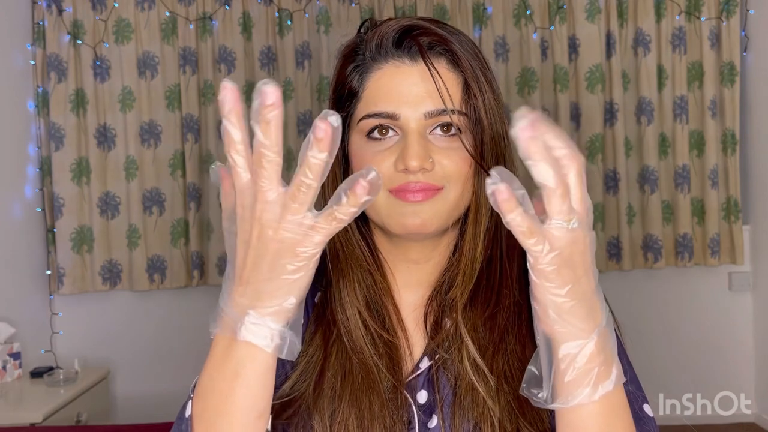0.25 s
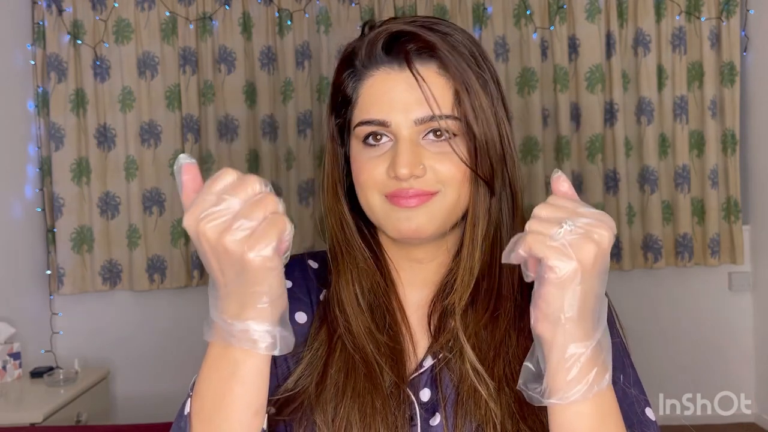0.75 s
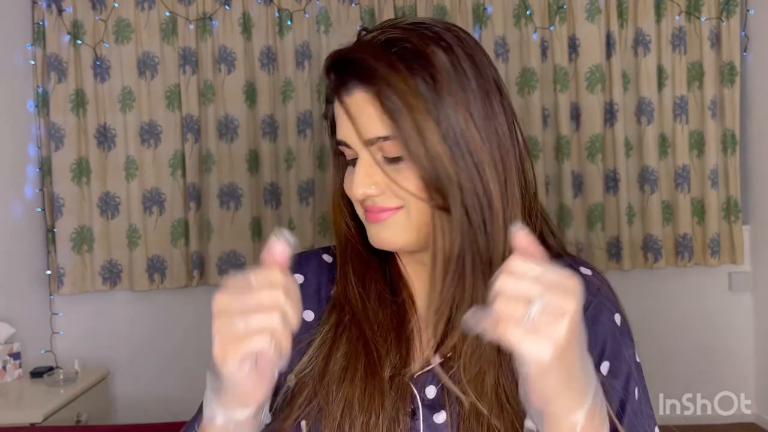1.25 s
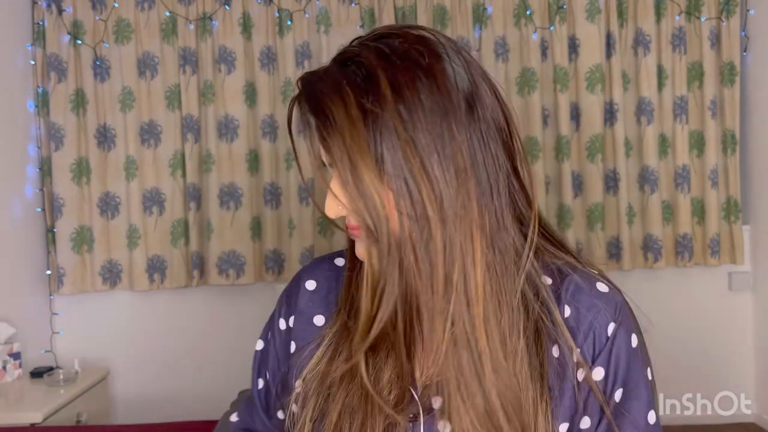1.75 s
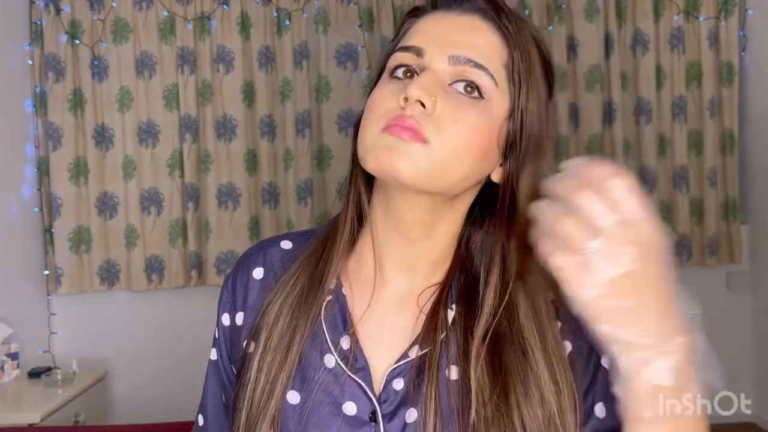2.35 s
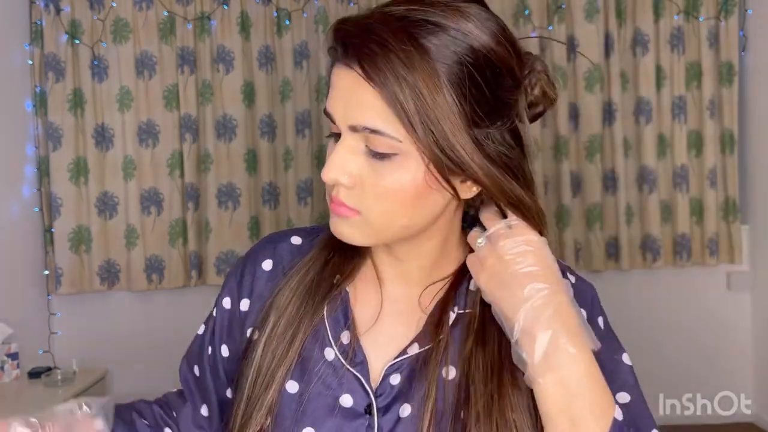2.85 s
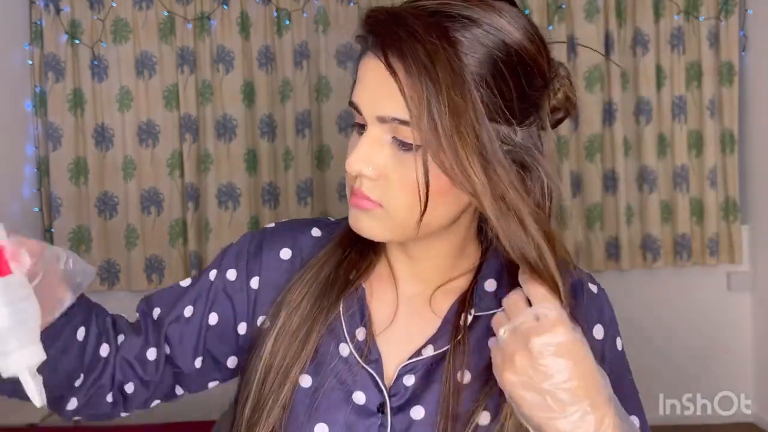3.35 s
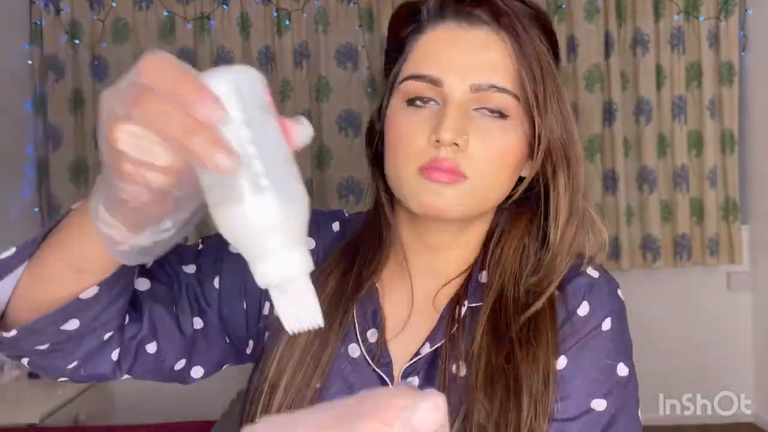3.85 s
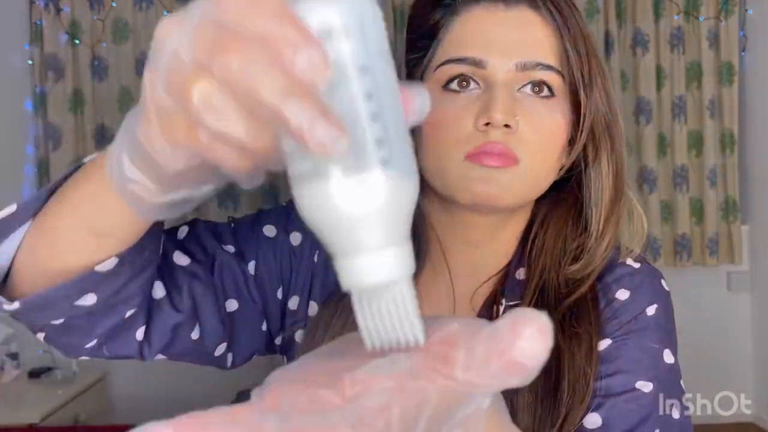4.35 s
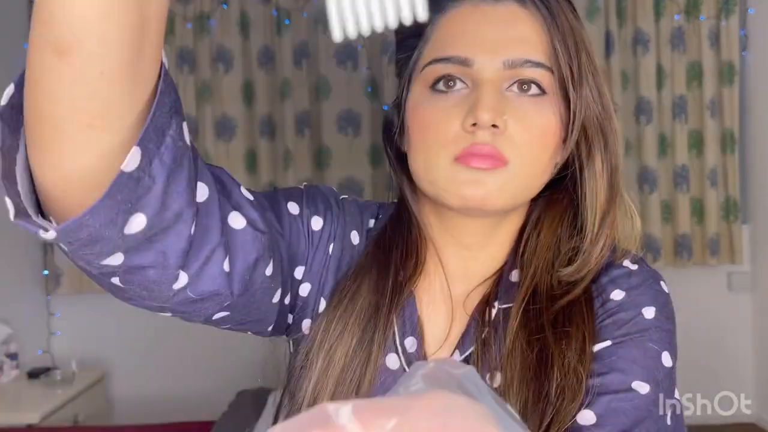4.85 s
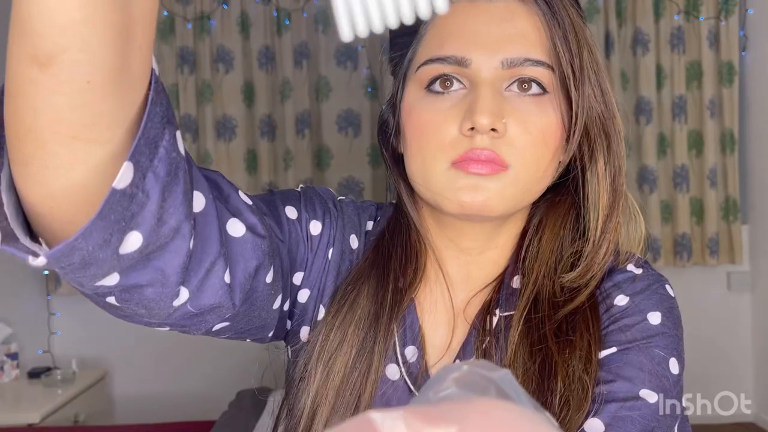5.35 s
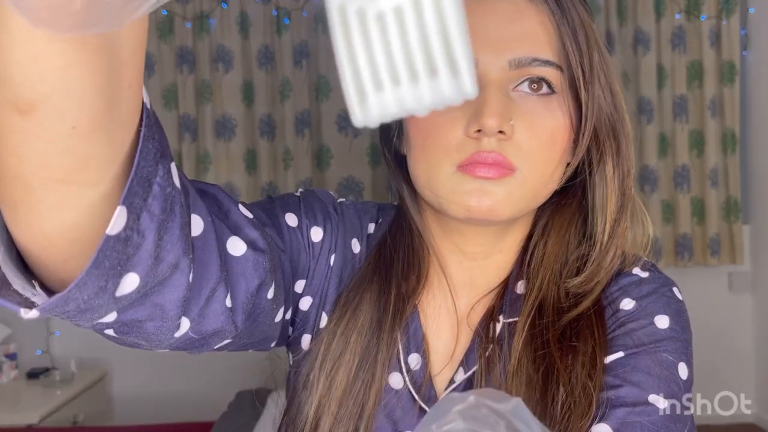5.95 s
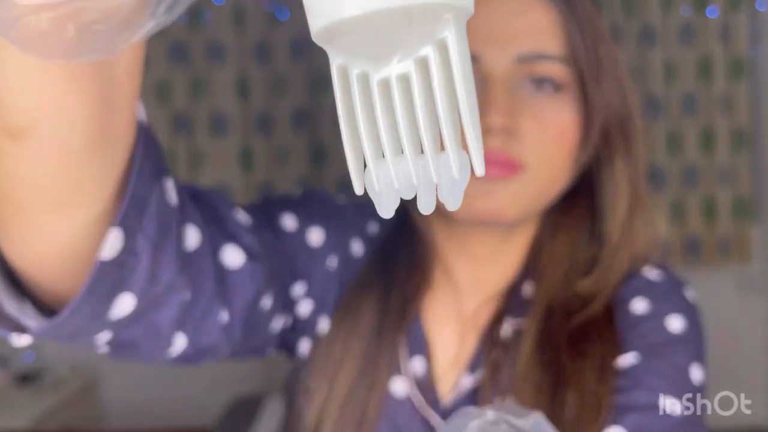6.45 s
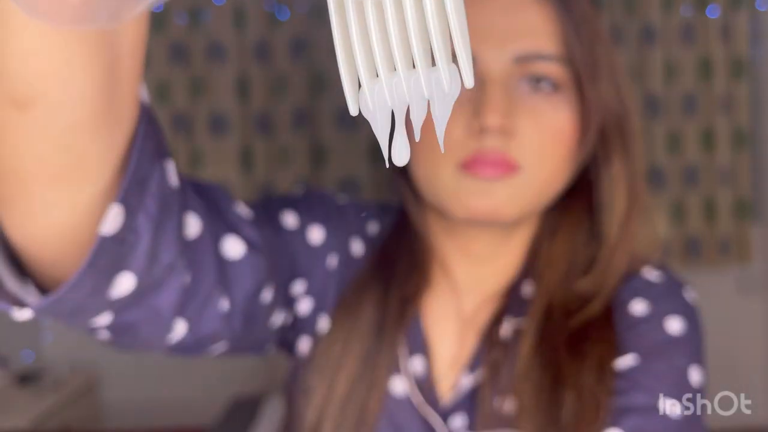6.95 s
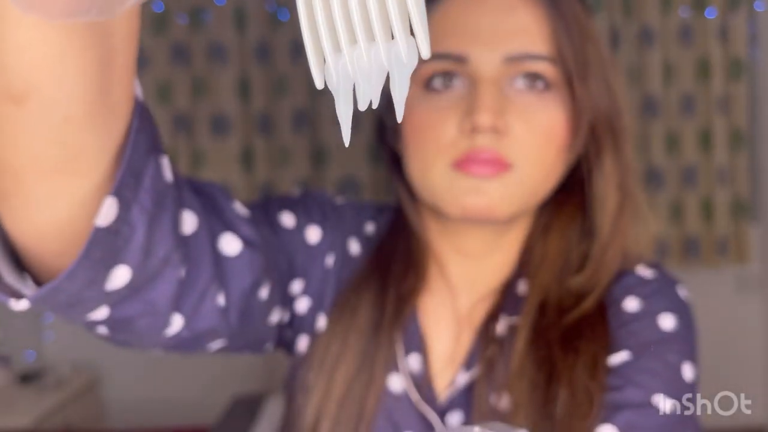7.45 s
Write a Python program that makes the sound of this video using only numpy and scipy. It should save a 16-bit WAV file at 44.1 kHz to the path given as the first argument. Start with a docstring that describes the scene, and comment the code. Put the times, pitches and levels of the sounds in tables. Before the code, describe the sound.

Close up in a small, soft-furnished room, thin plastic gloves flex. Crisp creases snap over a hissy film rustle, loudest around 0.25-0.6 s, thinning to a lull near 1.0 s, then swelling moderately until 1.7 s. After a tiny dip at 1.8 s the sound becomes fast motion: brighter, shorter, finer. Quick rustling strokes pass through hair from 1.9 to 3.5 s, with two small snaps near 2.3 s. From 3.55 s the bottle is gripped and moved, with denser crackle and a strong burst at 4.2-4.7 s. Rustling fades from 4.8 s, leaving scattered ticks until 5.55 s, then near quiet with faint low air rumble. Tiny slips tick around 6.3 s. At 6.7 s a cluster of sharp clicks with soft low bottle knocks stands out, followed by smaller ones at 7.04, 7.2-7.3 and 7.65 s. Short, dull echoes spread in stereo.

```python
"""Thin plastic gloves crackle up close in a small room, then stroke hair and squeeze a plastic bottle.
Creases snap as noise bursts through ringing facets, over a hiss of sliding film built from dense catches.
The bottle knocks softly as a sum of decaying wall modes; filtered noise makes the air and fan rumble.
After the first flexing the scene runs in fast motion, so every pitch is higher and every ring shorter."""
import sys
import numpy as np
from scipy import signal
from scipy.fft import rfft, irfft, next_fast_len
from scipy.io import wavfile
from scipy.ndimage import uniform_filter1d

SR = 44100
rng = np.random.default_rng(int(sys.argv[2]) if len(sys.argv) > 2 else 0)


def int16_out(signal):
    """Quantize to a 16-bit WAV file."""
    q = np.round(np.clip(np.atleast_2d(signal).T, -1, 1) * 32767)
    wavfile.write(sys.argv[1], SR, q.astype(np.int16))


N = 340011
TIME = np.arange(N) / SR
# Start of the fast motion, and how many times faster it runs than normal
FAST_FROM_S, FAST_SPEED = 1.835, 3.5


def from_db(db):
    """Decibels to gain."""
    return 10 ** (np.asarray(db) / 20)


def rms_one(x):
    """Scale to unit power."""
    return x / np.sqrt(np.mean(x ** 2) + 1e-20)


def in_time(rows):
    """Each column of a curve at every sample."""
    s, *columns = np.transpose(rows)
    return [np.interp(TIME, s, column) for column in columns]


def add(track, s, sound):
    """Mix a sound into a track at time s."""
    start = max(round(s * SR), 0)
    track[start:start + len(sound)] += sound[:N - start]


def filtered(x, response):
    """Apply a response given as a function of frequency."""
    size = next_fast_len(len(x))
    hz = np.fft.rfftfreq(size, 1 / SR) + 1e-3
    return irfft(rfft(x, size) * response(hz), size)[:len(x)]


def coloured(x, spectrum, speed):
    """Shape by a spectrum whose pitches rise with the playing speed."""
    points_hz, db = np.transpose(spectrum)

    def gain(hz):
        return from_db(np.interp(np.log(hz / speed), np.log(points_hz), db, right=-120))
    return filtered(x, gain)


# Room air as it sounds in fast motion: f/Hz, relative level/dB
AIR_SPECTRUM = [(25, -38), (45, -19), (68, -7), (100, -11), (170, -12), (330, -14), (520, -23), (800, -27),
                (1400, -40), (3000, -43), (12000, -49), (15000, -60)]
# Fan blades beating the air, at normal speed: f/Hz, level/dB before the fan trim, width/Hz
FAN_BEATS = [(19.9, -69, 0.93), (39.82, -74, 0.85)]


def room_tone(speed, rumble_db, fan_db):
    """Low rumble of moving air with the unsteady beat of the fan, both from filtered noise."""
    air = coloured(rng.standard_normal(N), AIR_SPECTRUM, speed / FAST_SPEED)
    out = from_db(rumble_db) * rms_one(air)
    for beat_hz, db, width_hz in FAN_BEATS:
        def resonance(hz):
            return 1 / (1 + ((hz / speed - beat_hz) / width_hz) ** 2)
        beat = filtered(rng.standard_normal(N), resonance)
        out += from_db(db + fan_db) * rms_one(beat)
    return out


def reverberation(x, speed, t60_s=0.27, first_echo_s=.004, damping_hz=3400):
    """A dense tail of wall echoes; curtains swallow the treble. Settings are for normal speed."""
    age = np.arange(SR // 2) / SR * speed
    tail = rng.standard_normal(len(age)) * from_db(-60 * age / t60_s) * (age > first_echo_s)
    echoes = signal.oaconvolve(x, tail / np.linalg.norm(tail))[:N]
    return filtered(echoes, lambda hz: 1 / np.hypot(1, (hz / speed / damping_hz) ** 2))


# Both as at normal speed
CROSSOVER_HZ, LEFT_LAG_S = 3400, .00073


def microphones(x, speed, wet_db, wide_db, left_db=1.2, treble_width=0.38, wide_from_hz=70):
    """A close pair: echoes spread sideways, less so above the crossover, where the left one hears later."""
    def below(hz):
        return 1 / (1 + (hz / speed / CROSSOVER_HZ) ** 12)

    def width(hz):
        return np.maximum(below(hz), treble_width) * hz / np.hypot(hz, wide_from_hz * speed)

    def left_ear(hz):
        lag_phase = LEFT_LAG_S * np.maximum(hz / speed - CROSSOVER_HZ, 0)
        return from_db(left_db * below(hz)) * np.exp(-2j * np.pi * lag_phase)

    mid = x + from_db(wet_db) * reverberation(x, speed)
    side = from_db(wide_db) * filtered(reverberation(x, speed), width)
    left = filtered(mid + side, left_ear)
    right = filtered(mid - side, lambda hz: from_db(-left_db * below(hz)))
    return np.array([left, right])


# Modes of the bottle wall at normal speed, before scatter and detuning: f/Hz, level/dB, t60/s
WALL_MODES = [(22.4, -1, 0.85), (38.3, 1, 0.32), (56.8, 1.5, 0.32), (83, 2.5, 0.16), (143, 2, 0.084),
              (290, 1, 0.032), (386, -15, 0.052), (540, -12, 0.035)]


def bottle(knocks, speed, scatter_db=3.0, give_s=.003):
    """Each knock rings every mode of the soft wall with a strength of its own."""
    out, age = np.zeros(N), np.arange(SR // 4) / SR * speed
    hz, mode_db, t60 = np.transpose(WALL_MODES)[:, :, None]
    for s, db in knocks:
        strength, grip = rng.standard_normal((2, len(WALL_MODES), 1))
        # the changing grip detunes the wall
        ringing = np.cos(2 * np.pi * hz * (1 + 0.075 * grip) * age)
        modes = ringing * from_db(mode_db + scatter_db * strength - 60 * age / t60)
        knock = modes[::2].sum(0) - modes[1::2].sum(0)  # neighbouring modes in opposite phase
        onset = 1 - np.exp(-age / give_s)
        add(out, s, from_db(db) * onset * knock)
    return out


def facet(x, speed, pitch_hz, ring_db, ring_width_hz=380):
    """A facet of film passes the snap on and rings briefly at its own pitch."""
    b, a = signal.iirpeak(min(pitch_hz * speed, .45 * SR), pitch_hz / ring_width_hz, fs=SR)
    return x + from_db(ring_db) * signal.lfilter(b, a, x + 1e-18)


# Colour of creasing film at normal speed: f/Hz, relative level/dB
CREASE_SPECTRUM = [(60, -14.5), (500, -21), (1100, -15.5), (2000, -12), (2700, -13.5), (3300, -10.5),
                   (4300, -4.5), (4800, -9.5), (5300, -20), (7500, -21.5), (8000, -42.5)]


def crease(speed, buckle_s=0.0018, low_hz=3000, high_hz=4500):
    """One large crease buckles in a short flurry, after a millisecond of stillness."""
    age = np.maximum(np.arange(2048) / SR - .001, 0) * speed / buckle_s
    burst = rng.choice([-1, 1], len(age)) * age * np.exp(-age)
    pitch_hz = low_hz + (high_hz - low_hz) * rng.random()
    return coloured(facet(burst, speed, pitch_hz, ring_db=9.0), CREASE_SPECTRUM, speed)


def snaps(rows, speed):
    """Large creases pop singly."""
    out = np.zeros(N)
    for s, db in rows:
        shape = crease(speed)
        add(out, s, from_db(db) * shape / np.abs(shape).max())
    return out


def stray_snaps(effort_db, from_s, to_s, over_db, spread_db, count):
    """Middling creases pop at random, as strong as the hand moves: rows of t/s, peak level/dB."""
    when, size = rng.random((count, 2)).T
    s = from_s + when * (to_s - from_s)
    peak_db = np.interp(s, TIME, effort_db) + over_db + spread_db * (size - .5)
    return list(zip(s, peak_db))


def slips(rows, speed, fade=1.1, unevenness=1.2):
    """The grip lets go for a moment and the film chatters over the bottle."""
    out, age = np.zeros(N), np.arange(4096) / SR
    for s, db, length, pitch_hz in rows:
        catches = rng.standard_normal(len(age)) * rng.exponential(1, len(age)) ** unevenness
        chatter = catches * np.exp(-fade * age / length) * (age < length)
        ringing = facet(chatter, speed, pitch_hz, ring_db=10.0, ring_width_hz=77)
        sound = coloured(ringing, CREASE_SPECTRUM, speed)
        add(out, s, from_db(db) * sound / np.std(sound[age < length]))
    return out


# The bottle giving way as it is gripped and squeezed: t/s, crease peak level/dB, chatter level/dB,
# chatter length/s, chatter f/Hz at normal speed, knock level/dB
GRIPS = [(3.584, -29, -47, .02, 800, -63), (3.913, -33, -46.5, 0.016, 330, -62.5),
         (6.674, -23, -48, 0.0094, 414, -50), (6.712, -35, -55, 0.023, 370, -50.5),
         (6.736, -27, -54.5, 0.019, 380, -49), (7.038, -28, -54, 0.012, 890, -53),
         (7.203, -32, -49.5, 0.011, 325, -57.5), (7.283, -38.5, -66, 0.011, 950, -56.5),
         (7.654, -34.5, -59, 0.0081, 710, -60)]
CHATTER_LEAD_S = .002
SETTLE_DB, SETTLE_S = -18.5, 0.049  # level relative to the chatter, and length


def squeezes(speed):
    """Each time the glove chatters, the wall gives way with a pop and a knock, and the film settles."""
    pops, chatter, knocks = [], [], []
    for s, pop_db, chatter_db, length, pitch_hz, knock_db in GRIPS:
        pops.append((s, pop_db))
        knocks.append((s, knock_db))
        chatter.append((s - CHATTER_LEAD_S, chatter_db, length, pitch_hz))
        chatter.append((s + length, chatter_db + SETTLE_DB, SETTLE_S, pitch_hz))
    return snaps(pops, speed) + slips(chatter, speed) + bottle(knocks, speed)


def clicks(per_s, spread_db, even_s):
    """Random clicks of scattered size, whose power is held steady over about even_s."""
    sizes = from_db(spread_db * np.minimum(rng.exponential(1, N), 4)) * rng.choice([-1, 1], N)
    train = sizes * (rng.random(N) < per_s / SR)
    window = int(even_s * SR)
    power = uniform_filter1d(uniform_filter1d(train ** 2, window), window)
    return train / np.sqrt(np.abs(power) + 1e-4)


def crackle(level_db, speed, spectrum, low_hz, high_hz, per_s, spread_db,
            buckle_s=0.00085, crowding=.7, count=12):
    """Film catches at random, more often the harder the hand moves; each is a noisy flurry in one facet."""
    # per_s is the rate at an effort of -51 dB
    train = clicks(per_s * from_db(crowding * (level_db + 51)), spread_db, even_s=0.045)
    dealt = rng.integers(0, count, N)  # which facet takes each catch
    fade, out = np.exp(-speed / (buckle_s * SR)), 0
    grit = rng.standard_normal(N)
    for k, pitch_hz in enumerate(np.linspace(low_hz, high_hz, count)):
        flurries = signal.lfilter([1], [1, -2 * fade, fade ** 2], train * (dealt == k) + 1e-18)
        # as the hand turns, facets take over from one another and the colour wanders
        turns = np.arange(0, TIME[-1] + 1, .4 / speed)
        share = from_db(3.5 * np.interp(TIME, turns, rng.standard_normal(len(turns))))
        out = out + facet(flurries * share * grit, speed, pitch_hz, ring_db=14)
    return from_db(level_db) * rms_one(coloured(out, spectrum, speed))


def sliding(effort_db, usual_db, follows):
    """The hiss of sliding film grows with effort, at a rate that depends on what it rubs."""
    usual_effort_db = -48
    return usual_db + follows * (effort_db - usual_effort_db)


# Effort of the hands flexing at normal speed: t/s, level/dB
FLEXING_EFFORT = [(0, -42), (.08, -48.5), (.155, -55), (.25, -38.5), (.34, -36.5), (.55, -42), (.6, -41.5),
                  (.64, -49), (.88, -50.5), (1.02, -62.5), (1.18, -48), (1.4, -44), (1.48, -46.5),
                  (1.59, -44), (1.65, -54), (1.82, -53)]
# Loudest creases snapping, at both speeds: t/s, peak level/dB before the snap trim
LOUD_SNAPS = [(0.0522, -27), (0.2846, -20.5), (0.3278, -18.5), (0.374, -20), (0.4439, -28), (0.4842, -25.5),
              (0.5967, -26), (1.0423, -37.5), (1.5758, -33), (2.2772, -27.5), (2.298, -28), (3.8016, -31),
              (4.3716, -22.5), (4.4794, -23.5), (4.5414, -28), (4.5701, -25), (4.59, -22), (4.6949, -27),
              (4.911, -40), (4.9468, -35), (4.982, -31), (5.0092, -26), (5.0254, -33), (5.071, -32.5),
              (5.1434, -31), (5.2021, -46), (5.239, -38), (5.304, -37), (5.3906, -33), (5.5528, -40.5),
              (6.351, -48), (6.3634, -42), (6.628, -52), (6.7224, -30), (6.8374, -40.5), (6.8773, -30.5),
              (6.912, -40.5), (6.991, -39.5), (7.346, -44), (7.6046, -42)]
# Colour of film sliding, at normal speed: f/Hz, relative level/dB
SLIDING_SPECTRUM = [(20, -18), (90, 4), (500, -1), (1100, -0.5), (1700, -2), (2600, 0), (3400, -1.5),
                    (4400, 14.5), (5300, -7.5), (7500, -6), (8000, -35)]


def flexing_hands():
    """Fingers open and close at normal speed: small creases snap while film slides on film."""
    effort_db, = in_time(FLEXING_EFFORT)
    sliding_db = sliding(effort_db, usual_db=-46, follows=.7)
    film = from_db(1.5) * crackle(effort_db, 1, CREASE_SPECTRUM, low_hz=2800, high_hz=4430,
                                  per_s=240, spread_db=-2.0)
    film += from_db(-2.5) * crackle(sliding_db, 1, SLIDING_SPECTRUM, low_hz=410, high_hz=3750,
                                    per_s=1500, spread_db=1.0)
    film += from_db(-1.0) * snaps([row for row in LOUD_SNAPS if row[0] < FAST_FROM_S], 1)
    air = room_tone(1, rumble_db=-70, fan_db=-5.5)
    return microphones(film + air, 1, wet_db=-7.5, wide_db=-5.5)


# Steady handling effort in fast motion: t/s, level/dB
HANDLING_EFFORT = [(1.9, -47.5), (2.12, -51.5), (2.26, -55.5), (2.4, -48.5), (2.8, -48), (3.1, -50),
                   (3.28, -56), (3.5, -53), (3.72, -49), (4.1, -51.5), (4.42, -55), (4.8, -59),
                   (4.92, -71.5), (5.2, -69), (5.35, -75.5), (5.5, -77), (5.62, -88)]
# Brisk hand moves through the hair and round the bottle: t/s, hold/s, level/dB
HAND_STROKES = [(1.868, 0.11, -46.5), (2.193, 0.036, -50.5), (2.309, 0.042, -48.5), (2.474, 0.037, -48.5),
                (2.65, 0.07, -50), (2.84, 0.053, -48), (3.006, 0.029, -49), (3.39, 0.096, -53.5),
                (3.55, 0.09, -45), (3.78, 0.02, -57), (3.85, 0.048, -45), (3.904, 0.017, -40.5),
                (3.985, 0.21, -45.5), (4.191, 0.07, -38), (4.266, .09, -43), (4.465, 0.017, -56.5),
                (4.539, 0.092, -48.5), (4.627, 0.047, -50.5), (4.84, 0.042, -55.5), (4.962, 0.017, -60),
                (5.07, 0.019, -52), (5.171, .04, -64)]
STROKE_ATTACK_S, STROKE_RELEASE_S = 0.0074, 0.013


def stroking():
    """Each move swells, holds and dies away on top of the steady handling: effort in dB."""
    power = from_db(in_time(HANDLING_EFFORT)[0]) ** 2
    for s, hold, db in HAND_STROKES:
        before = np.maximum(s - TIME, 0) / STROKE_ATTACK_S
        after = np.maximum(TIME - s - hold, 0) / STROKE_RELEASE_S
        swell = np.exp(-np.minimum(before + after, 20))
        power = power + (from_db(db) * swell) ** 2
    return 10 * np.log10(power)


# Film catch rate, as fine hair is smooth and a resting grip sparse: t/s, rate factor
CATCH_FINENESS = [(2.3, 2.2), (2.4, 4.9), (3.4, 5.1), (4.4, 1), (4.95, 0.53)]
# The glove slipping on the bottle: t/s, level/dB, length/s, f/Hz at normal speed
GLOVE_SLIPS = [(5.388, -52, 0.013, 804), (5.545, -62.5, 0.012, 696), (6.21, -71.5, .011, 800),
               (6.338, -71, 0.061, 635), (6.376, -49.5, 0.0019, 620), (6.836, -57.5, .012, 366)]
HAIR_UNTIL_S = 3.53


def handling_bottle():
    """In fast motion the hands part the hair, lift the bottle, come to rest and squeeze it."""
    effort_db = stroking()
    on_hair_db = sliding(effort_db, usual_db=-51, follows=1.01)
    on_bottle_db = sliding(effort_db, usual_db=-52, follows=0.77)
    sliding_db = np.where(TIME < HAIR_UNTIL_S, on_hair_db, on_bottle_db)
    moving = np.interp(TIME, [5.55, 5.66], [1, 0])
    fineness, = in_time(CATCH_FINENESS)
    film = from_db(-0.26) * crackle(effort_db, FAST_SPEED, CREASE_SPECTRUM, low_hz=2850, high_hz=4630,
                                    per_s=750 * fineness, spread_db=2.5)
    film += crackle(sliding_db, FAST_SPEED, SLIDING_SPECTRUM, low_hz=380, high_hz=3600,
                    per_s=4500 * fineness, spread_db=1.5)
    pops = [row for row in LOUD_SNAPS if row[0] > FAST_FROM_S]
    pops += stray_snaps(effort_db, 3.6, 5.55, over_db=20.5, spread_db=1, count=28)
    grip = from_db(-1.0) * snaps(pops, FAST_SPEED)
    grip += slips(GLOVE_SLIPS, FAST_SPEED) + squeezes(FAST_SPEED)
    air = room_tone(FAST_SPEED, rumble_db=-68.5, fan_db=0.0)
    return microphones(moving * film + grip + air, FAST_SPEED, wet_db=-11.5, wide_db=-5.0)


def scene():
    """The two speeds meet in a brief dip."""
    normal = np.clip((FAST_FROM_S - TIME) / 0.008, 0, 1)
    fast = np.clip((TIME - FAST_FROM_S) / 0.034, 0, 1)
    return normal * flexing_hands() + fast * handling_bottle()


def record(dry):
    """The top is cut steeply above 15.9 kHz."""
    lowpass = signal.ellip(10, .2, 80, 15900, fs=SR, output="sos")
    return signal.sosfilt(lowpass, dry)


dry = scene()
out = record(dry)
int16_out(out)
```